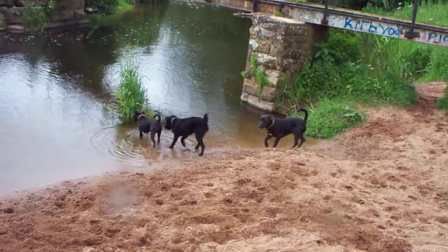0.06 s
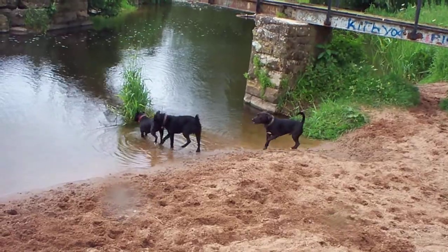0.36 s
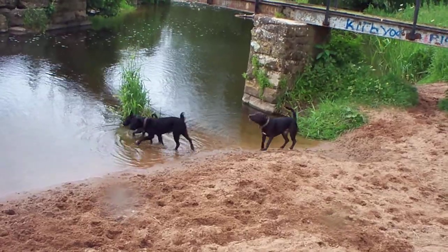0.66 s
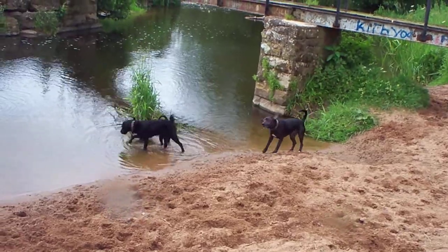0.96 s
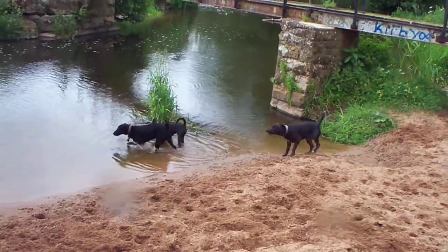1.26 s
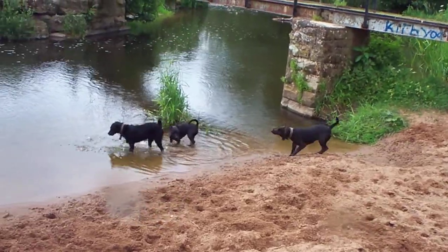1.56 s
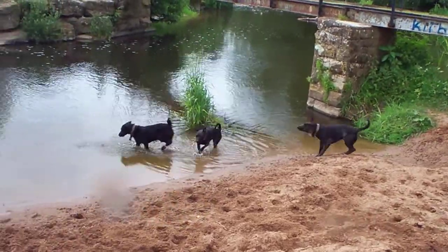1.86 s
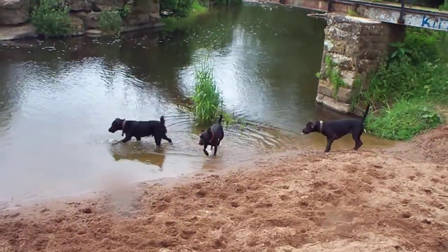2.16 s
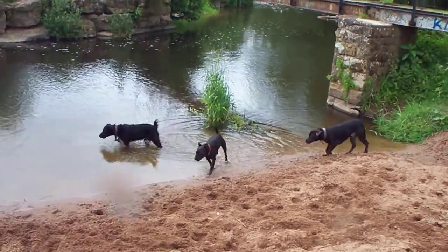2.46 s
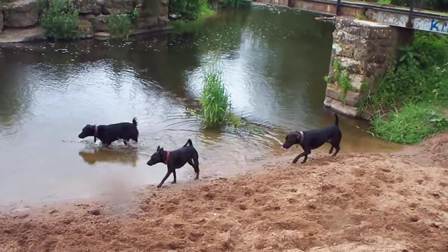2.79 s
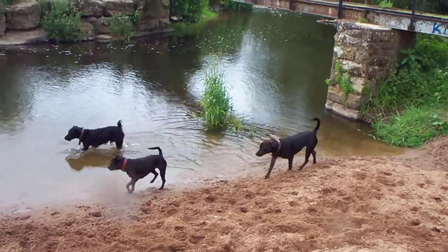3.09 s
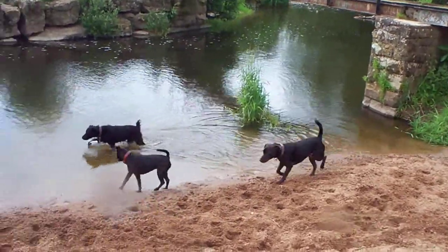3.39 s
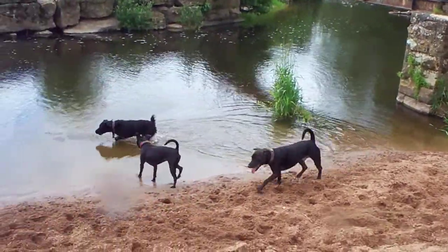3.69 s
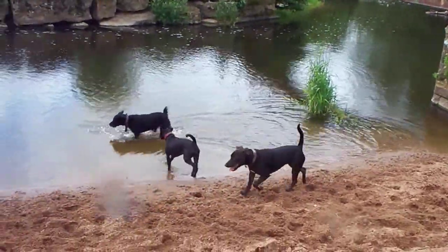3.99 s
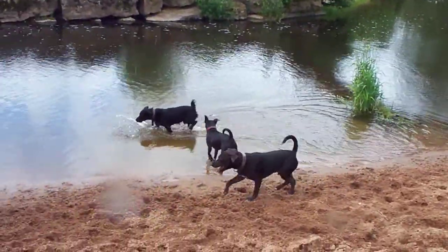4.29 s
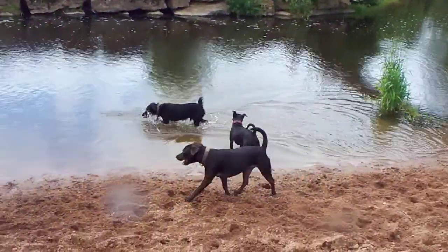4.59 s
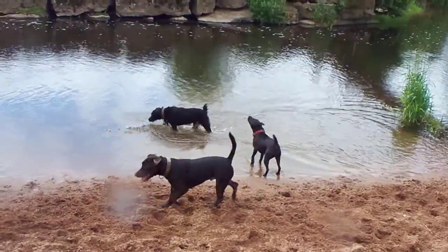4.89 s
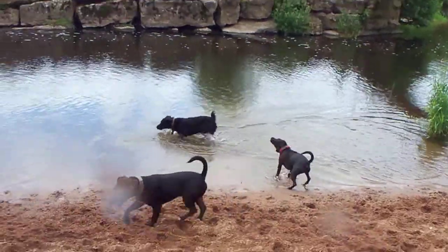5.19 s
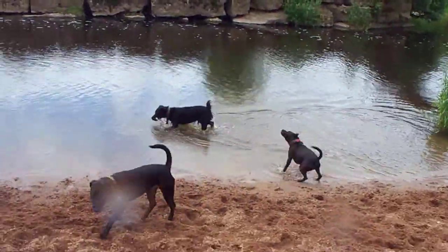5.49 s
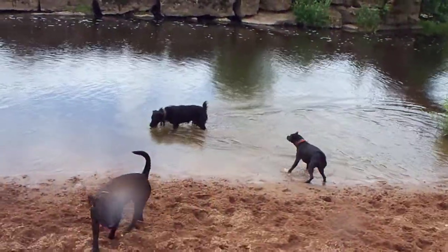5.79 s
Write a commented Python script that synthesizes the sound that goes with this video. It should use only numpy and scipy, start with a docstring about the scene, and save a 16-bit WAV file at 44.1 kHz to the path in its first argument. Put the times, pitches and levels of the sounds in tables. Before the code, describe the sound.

Dogs wade and splash in a shallow river, with a brief thin whine and low wind thumps on the microphone early on.

```python
"""Dogs wading in a shallow river.

Paws trap air that resonates in plops, clouds of bubbles slosh and fizz, drops tick, a pebble clacks.
One dog whines thinly at first. Early gusts thump on the microphone as pressure pulses, then die away.
Behind lie the river, a far rumble, a few bird whistles and a faint hoot.
The small microphone gives it all a hollow, narrow treble."""
import sys
import numpy as np
from scipy import signal
from scipy.fft import rfft, irfft, next_fast_len
from scipy.io import wavfile
from scipy.ndimage import map_coordinates

SR = 44100
rng = np.random.default_rng(int(sys.argv[2]) if len(sys.argv) > 2 else 0)


def int16_out(signal):
    """Quantize to a 16-bit WAV file."""
    q = np.round(np.clip(np.atleast_2d(signal).T, -1, 1) * 32767)
    wavfile.write(sys.argv[1], SR, q.astype(np.int16))


N = 257984
TIME = np.arange(N) / SR


def amp(db):
    """Amplitude grows tenfold for every 20 dB."""
    return 10 ** (np.asarray(db) / 20)


def unit(x):
    """Normalisation to an rms of 1."""
    return x / np.sqrt(np.mean(x ** 2) + 1e-20)


def curves(rows):
    """Linear interpolation: one value per sample for each column after the time."""
    times, *columns = np.transpose(rows)
    return [np.interp(TIME, times, column) for column in columns]


def wobble(rate):
    """Smooth random modulation: a spline through rate knots a second."""
    return map_coordinates(rng.standard_normal(int(N * rate / SR) + 4), [TIME * rate])


def coloured(x, points):
    """Minimum-phase filtering with the gain of the (Hz, dB) points."""
    size = 2 * next_fast_len(N // 2 + 8192)
    hz, db = np.transpose(points)
    gain = amp(np.interp(np.log(np.fft.rfftfreq(size, 1 / SR) + 1), np.log(hz), db))
    cepstrum = irfft(np.log(gain), size)
    cepstrum[1:size // 2] *= 2  # folding the cepstrum makes the filter causal
    cepstrum[size // 2 + 1:] = 0
    return irfft(rfft(x, size) * np.exp(rfft(cepstrum)), size)[:N]


def noise(points):
    """Spectral shaping of white noise, at an rms of 1."""
    return unit(coloured(rng.standard_normal(N), points))


def add(track, start, sound):
    """Superposition of a sound on the track, from start in seconds."""
    part = track[max(round(start * SR), 0):][:len(sound)]
    part += sound[:len(part)]


def swell(peak, rise, fall):
    """Exponential growth and decay about a rounded top of 1; all times in seconds."""
    distance = np.maximum((peak - TIME) / rise, (TIME - peak) / fall)
    return np.exp(.5 - np.hypot(.5, distance))


def ring(t, hz, cycles, rise, onset):
    """A damped oscillation, gliding up as a surfacing bubble does; cycles and onset count periods."""
    age = t * hz
    glide = 1 + rise * (1 - np.exp(-age / cycles / 2))
    return np.sin(2 * np.pi * age * glide) * np.exp(-age / cycles) * (1 - np.exp(-age / onset))


def bubbles(per_s, hz, octaves, cycles, spread_db, samples):
    """Bubble resonances, many weak and few strong, add incoherently to a cloud of rms 1."""
    when, pitch, rank = rng.random((int(per_s * N / SR), 3)).T
    pitch_hz = np.minimum(hz * 2 ** (octaves * (2 * pitch - 1)), SR / 3)[:, None]
    gain = amp(-spread_db * np.log(np.maximum(rank, .01)))[:, None]
    rings = gain * ring(np.arange(samples) / SR, pitch_hz, cycles, rise=0.1, onset=1.0)
    at = (when * N).astype(int)[:, None] + np.arange(samples)
    return unit(np.bincount(at.ravel(), rings.ravel(), N)[:N])


def tone(note, arch, waver, flutter_db):
    """A sine modulated in level and frequency; arch and waver are fractions of its gliding pitch."""
    start, length, first_hz, last_hz, db = note
    progress = np.clip((TIME - start) / length, 0, 1)
    effort = 4 * progress * (1 - progress)
    hz = (first_hz + (last_hz - first_hz) * progress) * (1 + arch * effort + waver * wobble(140))
    envelope = np.sqrt(2 * effort) * amp(db + flutter_db * wobble(45))
    return envelope * np.sin(2 * np.pi * np.cumsum(hz) / SR)


# Spectra of the river and the rumble. Each row: frequency in Hz, relative level in dB.
RIVER_SPECTRUM = [(100, -12), (250, 12.5), (450, -4.5), (700, -3.5), (1400, 0), (2200, -16), (4000, -13),
                  (8000, -24.5)]
RUMBLE_SPECTRUM = [(15, -15), (35, -1.5), (52, -2.5), (72, -0.5), (90, -22), (120, -14), (200, -21),
                   (400, -22.5), (1000, -50.5)]


def background():
    """Nearly stationary noise: the flowing river and a distant low rumble."""
    river = amp(-61 + .7 * wobble(7.6)) * noise(RIVER_SPECTRUM)
    rumble = amp(-47 + .46 * wobble(3.91)) * noise(RUMBLE_SPECTRUM)
    return river + rumble


# Water stirred by the legs. Each row: time in seconds, relative slosh and spray levels in dB.
STIRRING = [(0.0, -53, -61.5), (0.33, -54.5, -65.5), (0.72, -56, -63.5), (1.14, -52.5, -55.5),
            (1.34, -52, -56.5), (1.76, -49.5, -54.5), (2.07, -50, -58), (3.08, -52, -58.5),
            (3.8, -48.5, -58.5), (4.09, -48.5, -55.5), (4.5, -49.5, -58.5), (4.76, -53, -59),
            (5.38, -48, -54.5), (5.85, -51, -57.5)]
# Spectra of the slosh and spray noise. Each row: frequency in Hz, relative level in dB.
SLOSH_SPECTRUM = [(150, -20), (400, -2.5), (650, -5.5), (1100, 3.5), (1800, -2.5), (2800, -10),
                  (5000, -18.5), (9000, -37)]
SPRAY_SPECTRUM = [(1000, -12), (2500, 1), (5000, -2.5), (7000, 0), (9000, -5.5)]


def wading():
    """Air entrainment: legs churn up larger bubbles and a fine spray, both in quick uneven spurts."""
    slosh_db, spray_db = curves(STIRRING)
    spurt = wobble(30)
    churn = bubbles(per_s=1100, hz=1250, octaves=1.3, cycles=4.5, spread_db=3.6, samples=900)
    churn = unit(coloured(churn, [(300, -8.5), (700, -4.5), (1800, 1.0), (3000, -6.5)]))
    slosh = unit(churn + 0.62 * noise(SLOSH_SPECTRUM))
    droplets = bubbles(per_s=1200, hz=6300, octaves=.45, cycles=4, spread_db=4.6, samples=160)
    spray = unit(droplets + 1.25 * noise(SPRAY_SPECTRUM))
    return amp(slosh_db + 1 + 1.94 * spurt) * slosh + amp(spray_db + 1 + 1.8 * spurt) * spray


def eddy(peak, hz):
    """A vortex has a low-pressure core: one dip as it passes the microphone port."""
    phase = np.clip(np.pi * hz * (TIME - peak), -10, 10)
    return (2 * phase ** 2 - 1) * np.exp(-phase ** 2)


# The dying breeze between gusts. Each row: time in seconds, level in dB.
BREEZE_LEVELS = [(0, -36), (.5, -32.5), (.85, -38.5), (1.5, -38), (2.15, -47), (2.6, -54.5), (2.9, -39),
                 (3.4, -51)]
# Gusts, each with one hard eddy at its height. Each row: peak time and decay time in seconds,
# buffet level in dB, relative thump level in dB, eddy pitch in Hz.
GUST_PEAKS = [(0.029, 0.043, -16, -13.5, 152), (.22, 0.054, -26.5, -23, 84),
              (0.314, 0.035, -17.5, -17.5, 76), (.394, .022, -13, -22.5, 100),
              (0.46, 0.037, -21.5, -18.5, 66), (.5, 0.078, -25, -19, 74), (0.955, .03, -49.5, -29, 44),
              (1.184, 0.042, -20.5, -17.5, 106), (1.255, 0.066, -22.5, -18, 66),
              (1.47, 0.054, -29, -34.5, 131), (1.6, 0.037, -28.5, -30.5, 69),
              (1.775, 0.017, -33.5, -29, 49), (2.048, 0.028, -30.5, -73, 54.4),
              (2.286, 0.049, -39.5, -33, 54.7), (2.373, 0.037, -45, -30.5, 57.6),
              (2.429, 0.038, -36, -37, 64)]
# Spectra of the buffet and the flutter. Each row: frequency in Hz, relative level in dB.
BUFFET_SPECTRUM = [(8, -24), (25, 8.5), (55, 1.5), (100, -8), (160, -23.5), (300, -46.5), (700, -90)]
FLUTTER_SPECTRUM = [(60, -20), (140, 2), (250, -2.5), (400, -13), (800, -41), (2000, -61.5)]


def wind():
    """Turbulence buffets the port; harder gusts flutter higher, and the strongest eddies thump."""
    breeze_db, = curves(BREEZE_LEVELS)
    strength, thumps = amp(breeze_db), np.zeros(N)
    for peak, decay, buffet_db, thump_db, hz in GUST_PEAKS:
        gust = amp(buffet_db) * swell(peak, rise=0.95 * decay, fall=decay)
        strength = np.maximum(strength, gust)
        shed_eddy = amp(12 + 2.63 * buffet_db) * eddy(peak, hz=361)
        thumps += amp(thump_db) * eddy(peak, hz) + shed_eddy
    buffet = strength * noise(BUFFET_SPECTRUM)
    flutter = amp(-6.5) * strength ** 1.564 * noise(FLUTTER_SPECTRUM)
    return buffet + flutter + amp(4) * thumps


# The dog's notes. Each row: start and length in seconds, glide start and end in Hz, relative level in dB.
WHINE_NOTES = [(.05, 0.092, 1980, 1990, -54), (.222, 0.11, 2110, 2040, -49.5), (.3, 0.27, 2070, 2290, -59),
               (0.698, .09, 2290, 2430, -63), (.82, .07, 2590, 2540, -58)]


def whine():
    """Frequency modulation makes the dog's thin tone arch and shake."""
    return sum(tone(note, arch=.048, waver=.005, flutter_db=2) for note in WHINE_NOTES)


def stray_drops(per_s=6, hz=1700, scatter_db=3):
    """A random process of lesser drops, harder where more spray flies; rows as in LOUD_DROPS."""
    _, spray_db = curves(STIRRING)
    rows = []
    for when, ringing, pitch, crack in rng.uniform(-1, 1, (int(per_s * N / SR), 4)):
        at = int(abs(when) * N)
        ring_db = spray_db[at] + 25 + scatter_db * ringing
        crack_db = spray_db[at] + 30 + scatter_db * crack
        rows.append((at / SR, ring_db, hz * 2 ** (pitch / 2), crack_db))
    return rows


# The loudest drops. Each row: time in seconds, relative ring level in dB, pitch in Hz, crack level in dB.
LOUD_DROPS = [(0.1939, -22, 1700, -26), (0.5285, -27.5, 1575, -41), (.8687, -28.5, 1750, -44),
              (.8902, -26, 2190, -36.5), (0.9118, -29, 1640, -18.5), (0.9544, -19, 1630, -22.5),
              (1.0777, -29, 2370, -14), (1.2485, -18.5, 1830, -21.5), (1.2875, -18.5, 1680, -21),
              (1.4, -29, 1470, -23.5), (1.4298, -25.5, 2020, -20.5), (1.452, -16, 2040, -22),
              (1.6097, -15.5, 1870, -20.5), (1.6731, -22.5, 2880, -31.5), (1.731, -26, 2180, -16),
              (1.7726, -19.5, 2540, -26), (1.9027, -23.5, 2330, -33), (1.9315, -20.5, 1970, -26),
              (2.0754, -24.5, 2200, -24), (2.2617, -28.5, 1400, -44), (2.2678, -22, 1960, -31),
              (4.1296, -35, 1880, -25), (5.116, -23, 2520, -30)]


def drops():
    """Impact on the surface gives each drop a very short ring, a bright crack and a trace of mist."""
    out, t = np.zeros(N), np.arange(SR // 50) / SR
    for start, ring_db, hz, crack_db in list(LOUD_DROPS) + stray_drops():
        soft = np.clip((ring_db - crack_db - 6) / 8, 0, 1)  # a soft entry traps air and rings longer
        bubble = amp(-4 * soft) * ring(t, hz, cycles=0.5 + 3 * soft, rise=0.045, onset=0.1)
        mist = .11 * rng.standard_normal(len(t)) * np.exp(-t / .0033)
        crack = ring(t, hz=6000, cycles=.9, rise=.02, onset=.4) + mist
        add(out, start + .0008, amp(ring_db) * bubble - amp(crack_db) * crack)
    return out


# Paws plunging in. Each row: start in seconds, plop level in dB, pocket pitch in Hz, spray level in dB.
PAW_STEPS = [(0.8173, -32.5, 2170, -37), (1.337, -28, 656, -39), (1.7265, -49, 1500, -34.5),
             (1.845, -32.5, 1500, -43), (2.277, -30.5, 1710, -44), (2.399, -29.5, 1020, -57),
             (2.426, -33, 712, -59), (2.64, -25, 1015, -56), (2.662, -31.5, 614, -44.5),
             (2.838, -29, 630, -53), (2.858, -37.5, 714, -60), (3.195, -29.5, 1400, -38),
             (3.668, -23, 593, -45), (3.588, -33.5, 616, -48.5), (3.71, -31, 680, -58),
             (3.85, -32, 600, -55), (3.967, -31, 1170, -45), (4.184, -27, 1055, -52),
             (4.343, -29, 1050, -36.5), (4.479, -31, 804, -51), (4.648, -27.5, 657, -36),
             (4.894, -31, 1530, -44.5), (5.064, -26.5, 734, -46), (5.092, -29.5, 930, -50),
             (5.115, -31.5, 1560, -38.5), (5.242, -25.5, 836, -42), (5.542, -29, 1440, -56),
             (5.695, -30.5, 760, -58)]


def plops():
    """Bubble resonance: each paw traps a pocket of air; the deeper the pocket, the lower it rings."""
    out, t = np.zeros(N), np.arange(SR // 12) / SR
    for start, db, hz, _ in PAW_STEPS:
        add(out, start, amp(db) * ring(t, hz, cycles=3.0, rise=0.03, onset=0.66))
    return out


def splashes():
    """Secondary impacts: water thrown up by a paw falls back as a shower of small bubbles and spray."""
    fizz, mist, t = np.zeros(N), np.zeros(N), np.arange(SR // 5) / SR
    shower = np.exp(-t / 0.0066) * (1 - np.exp(-t / 0.00023))
    for start, plop_db, _, spray_db in PAW_STEPS:
        add(fizz, start, amp(plop_db - 16) * shower)
        add(mist, start, amp(spray_db) * shower)
    cloud = bubbles(per_s=2500, hz=1630, octaves=1.0, cycles=5.6, spread_db=6.5, samples=400)
    return fizz * cloud + mist * noise(SPRAY_SPECTRUM)


# Colour of the gurgle. Each row: frequency in Hz, relative gain in dB.
GURGLE_FILTER = [(200, -20.5), (450, -4.5), (650, 2.5), (1100, 2), (1800, -4.5), (3000, -24), (6000, -41)]


def gurgles(lag_s=.007):
    """Cavity collapse: after each step the water closes round the leg in a burst of large bubbles."""
    flow = sum(amp(db - 18) * swell(start + lag_s, rise=.005, fall=.02) for start, db, _, _ in PAW_STEPS)
    cloud = bubbles(per_s=600, hz=900, octaves=1.1, cycles=4, spread_db=2, samples=700)
    return flow * unit(coloured(cloud, GURGLE_FILTER))


# Bird whistles. Each row: start and length in seconds, glide start and end in Hz, relative level in dB.
BIRD_NOTES = [(2.47, .27, 3150, 3070, -65), (5.226, .11, 3190, 3070, -59.5),
              (5.625, 0.064, 5740, 5500, -57)]


def bird():
    """Each whistle is a nearly pure tone of slightly falling frequency."""
    return sum(tone(note, arch=-.005, waver=0.004, flutter_db=2) for note in BIRD_NOTES)


# Dull footfalls. Each row: start in seconds, level in dB, pitch in Hz.
PAW_THUDS = [(3.196, -34, 179), (3.668, -29, 520), (4.345, -36.5, 187)]


def thuds():
    """Heavy damping: some paws land with a low ring that dies within a few cycles."""
    out, t = np.zeros(N), np.arange(SR // 12) / SR
    for start, db, hz in PAW_THUDS:
        add(out, start, amp(db) * ring(t, hz, cycles=2.45, rise=0.023, onset=0.24))
    return out


# A far hoot. Each row: start and length in seconds, glide start and end in Hz, relative level in dB.
HOOT_NOTES = [(3.66, 0.41, 321, 319.7, -54.5), (4.0, .33, 321, 315.6, -60.5)]


def hoot():
    """Two partials make the hoot: a fundamental and its stronger octave."""
    out = np.zeros(N)
    for note in HOOT_NOTES:
        start, length, first_hz, last_hz, db = note
        octave = (start, length, 2 * first_hz, 2 * last_hz, db)
        out += amp(-4.5) * tone(note, arch=0, waver=0.006, flutter_db=2)
        out += amp(2) * tone(octave, arch=0, waver=0.0088, flutter_db=-1)
    return out


# Knocks of a pebble under a paw. Each row: start in seconds, relative level in dB, contact pitch in Hz.
PEBBLE_KNOCKS = [(5.419, -19, 1860), (5.4626, -13, 2840), (5.4951, -26.5, 3270)]
# The pebble's modes. Each row: frequency in Hz, relative level in dB, time to fall 60 dB in seconds.
PEBBLE_MODES = [(1680, -12, 0.028), (2680, -11.5, 0.018), (5170, -8, 0.0054), (6170, -7.5, 0.0036)]


def clacks():
    """Modal vibration: each knock is a short contact ring plus the pebble's quickly damped modes."""
    out, t = np.zeros(N), np.arange(SR // 25) / SR
    stone = sum(amp(db - 60 * t / t60) * np.sin(2 * np.pi * hz * t) for hz, db, t60 in PEBBLE_MODES)
    for start, db, hz in PEBBLE_KNOCKS:
        contact = amp(6.5) * ring(t, hz, cycles=1.5, rise=.02, onset=0.83)
        add(out, start, amp(db) * (contact + stone))
    return out


def banks(x, t60):
    """Scattering from stone walls and trees returns an exponentially decaying tail."""
    t = np.arange(SR // 2) / SR
    tail = rng.standard_normal(len(t)) * amp(-60 * t / t60) * (1 - np.exp(-t / 0.0046))
    return signal.fftconvolve(x, tail / np.linalg.norm(tail))[:N]


def scene():
    """Superposition of water and calls in the open air, with wind right at the microphone."""
    direct = wading() + drops() + clacks() + plops() + thuds() + gurgles() + splashes()
    direct += whine() + bird() + hoot()
    return (direct + amp(-28.5) * banks(direct, t60=0.2) + background() + wind())[None]


# The microphone's response and its crackle spectrum. Each row: frequency in Hz, relative level in dB.
MICROPHONE_RESPONSE = [(2600, -2), (3300, -2.5), (3800, -6.5), (4200, -22), (4600, -8), (5300, -2.5),
                       (7200, 5.5), (7900, 0), (8600, -10), (9200, -38)]
CRACKLE_SPECTRUM = [(600, -9), (2500, -3.5), (4200, -7), (7500, -9), (8800, -29.5)]
BAND_LIMIT_HZ = 9200


def record(dry):
    """A band-limited transducer: the microphone notches the treble and crackles under strong gusts."""
    low_pressure = np.abs(coloured(dry[0], [(150, 6), (500, -38.5)]))
    crackle = amp(-45) * low_pressure * unit(noise(CRACKLE_SPECTRUM) * amp(4.5 * wobble(500)))
    spectrum = rfft(coloured(dry[0], MICROPHONE_RESPONSE) + crackle, 2 * N)
    passband = np.fft.rfftfreq(2 * N, 1 / SR) < BAND_LIMIT_HZ
    return irfft(spectrum * passband)[None, :N]


dry = scene()
out = record(dry)
int16_out(out)
```